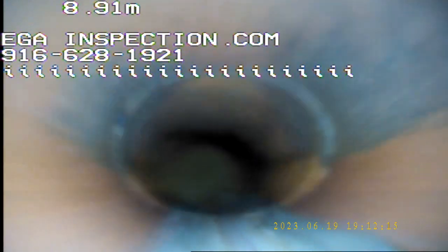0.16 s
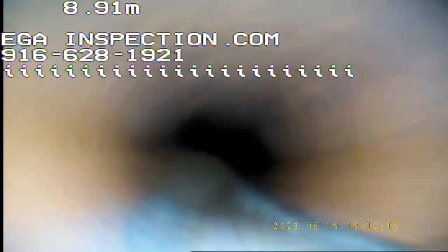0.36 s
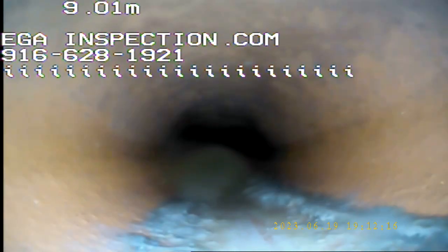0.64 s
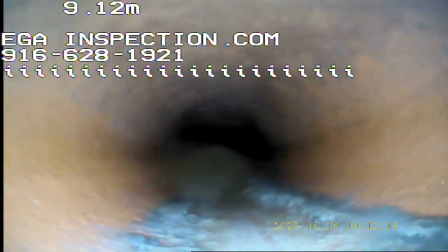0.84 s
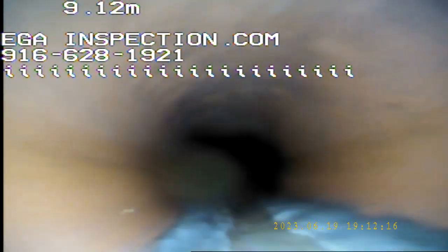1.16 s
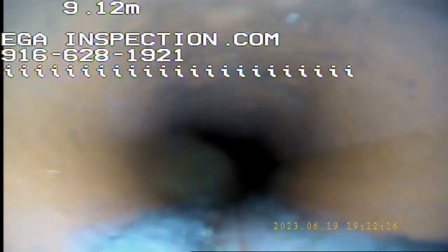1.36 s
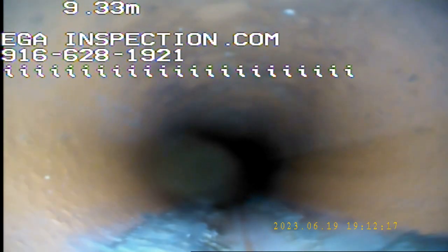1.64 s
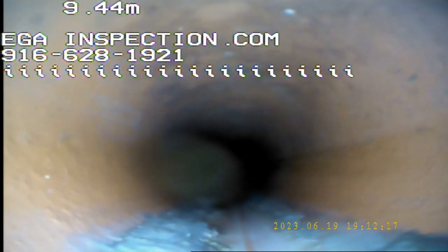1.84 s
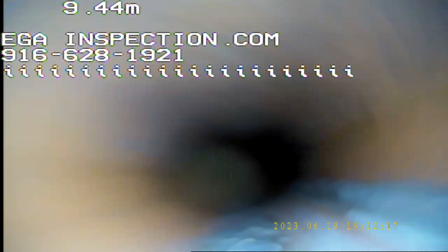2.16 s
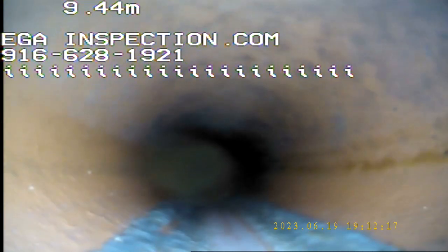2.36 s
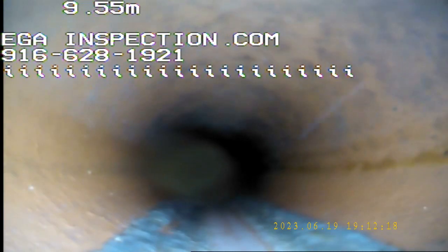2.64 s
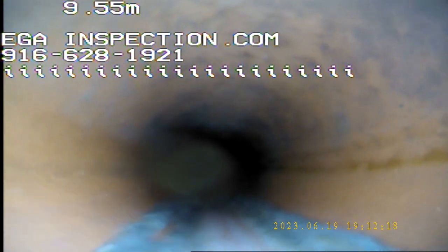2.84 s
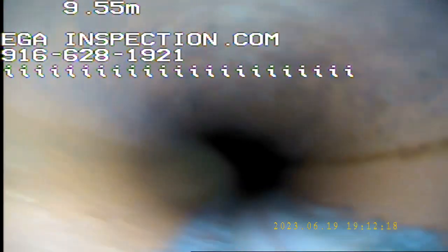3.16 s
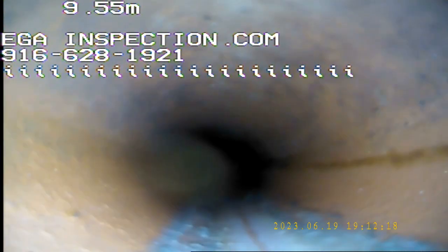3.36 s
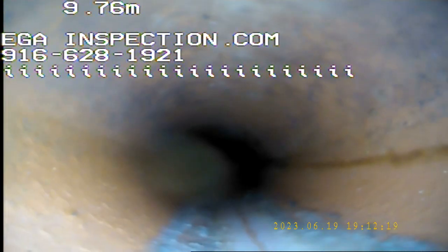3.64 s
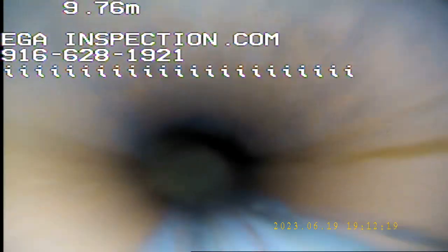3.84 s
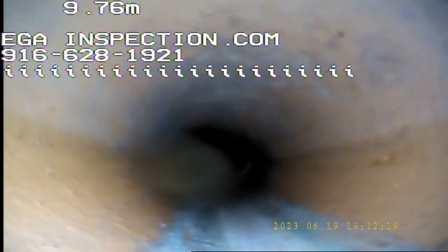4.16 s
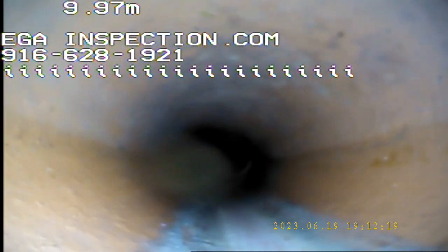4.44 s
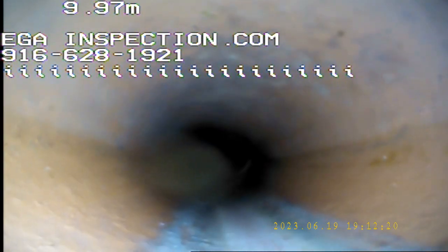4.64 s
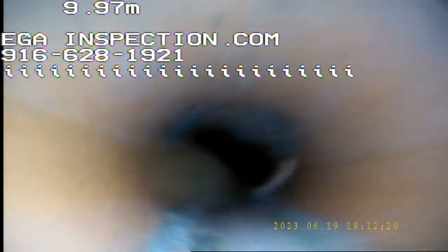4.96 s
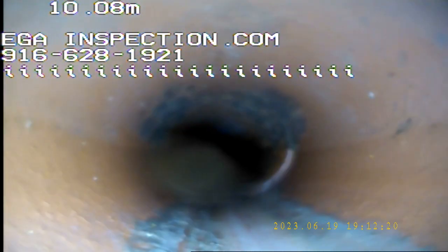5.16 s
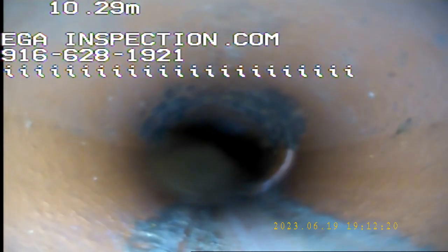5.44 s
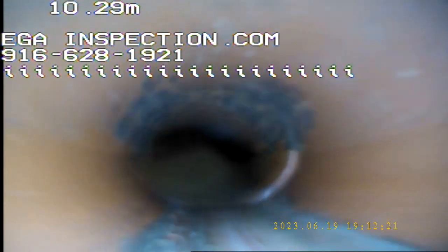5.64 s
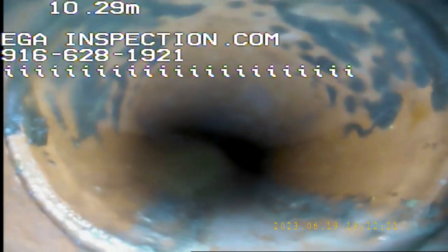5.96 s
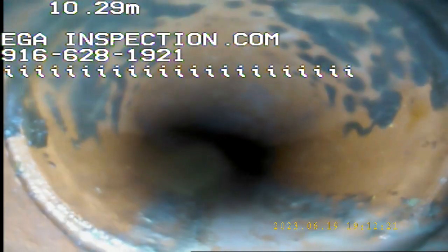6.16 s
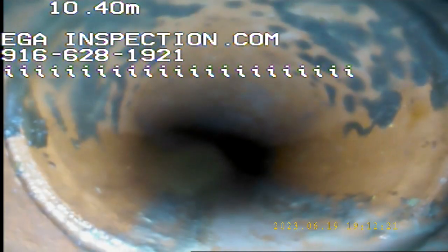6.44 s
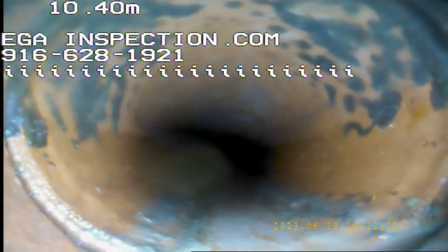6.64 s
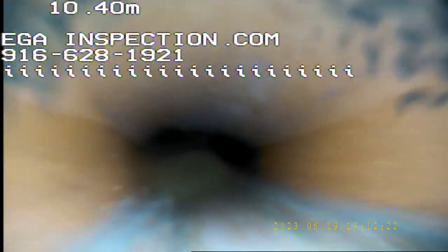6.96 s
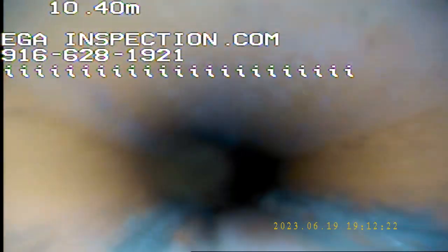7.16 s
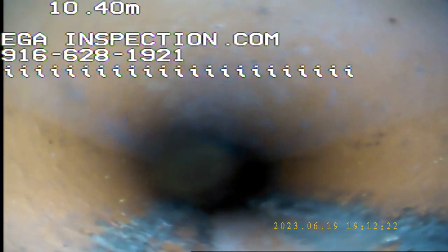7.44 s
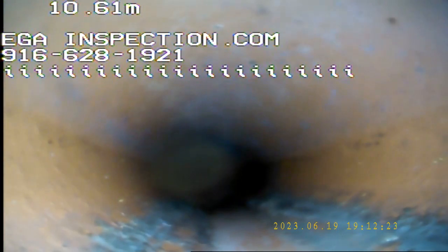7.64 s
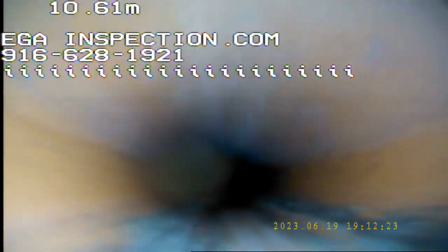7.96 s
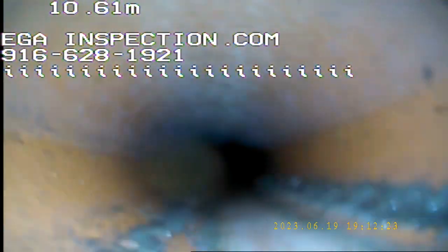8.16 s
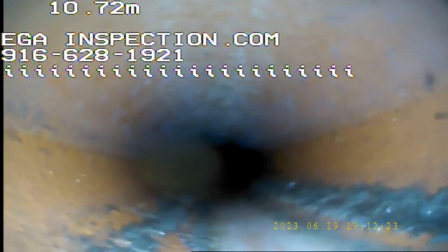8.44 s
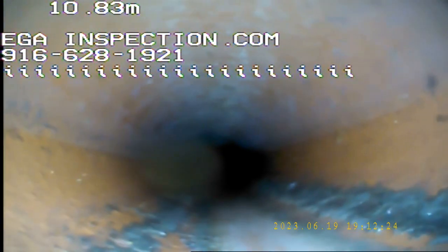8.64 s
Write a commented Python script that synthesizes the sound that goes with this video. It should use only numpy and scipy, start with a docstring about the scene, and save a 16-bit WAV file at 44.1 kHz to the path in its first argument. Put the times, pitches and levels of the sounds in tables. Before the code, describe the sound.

Loud, distorted low booms and hollow rattling scrapes come in uneven strokes as a rod is shoved through a pipe, crackling with overload over faint hiss.

```python
"""Camera rod in a drain pipe

A push rod feeds a camera head down a drain pipe in strokes; the microphone rides on the gear.
Stick-slip friction excites the modes of pipe, housing and rod; knocks ring rod and housing; hiss lies beneath.
An overloaded narrow-band converter flattens the wave at both rails, and at listed jolts samples
at the top flip to the bottom and crackle."""
import sys
import numpy as np
from scipy import signal
from scipy.fft import rfft, irfft
from scipy.io import wavfile
from scipy.ndimage import uniform_filter1d

SR = 44100
rng = np.random.default_rng(int(sys.argv[2]) if len(sys.argv) > 2 else 0)


def transcribe(u):
    """Save the signal u as a 16-bit wav file named by the first command-line argument.

    u: samples, shape (n,) or (channels, n), limited to [-1, 1]; the rate is SR.
    q: integer samples, one column per channel.
    """
    v = np.clip(np.atleast_2d(u).T, -1, 1)
    q = np.round(v * 32767).astype(np.int16)
    wavfile.write(sys.argv[1], SR, q)


N = 388509  # samples in the scene
CONVERTER_SR = 8000  # sample rate of the narrow-band converter, Hz

# Shoves of the rod; share is the part of the length at which the shove is hardest:
# start_s, length_s, peak_share, boom_db, thump_db, body_db
SHOVES = [(0.0, 0.0844, 0.326, -7.5, -13.5, -14.5), (.12, 0.292, 0.31, -18.5, -26.5, -23),
          (.46, 0.374, 0.662, -6, -9.5, -11.5), (.86, 0.1205, 0.28, -9.5, -20.5, -21),
          (1.02, 0.228, 0.62, -16, -28, -22.5), (1.225, 0.109, 0.286, -7, -9, -6),
          (1.385, 0.1084, 0.253, -6.5, -8.5, -7), (1.54, 0.2835, 0.598, -8, -10, -6),
          (1.86, 0.254, 0.285, -11.5, -24.5, -24.5), (2.1, 0.0906, 0.487, -8, -16.5, -16),
          (2.2, 0.129, 0.474, -18, -25.5, -20), (2.385, 0.451, 0.708, -8.5, -13, -12),
          (2.85, 0.214, 0.624, -14.5, -21.5, -26), (3.07, 0.1195, .5, -18.5, -17.5, -16),
          (3.225, 0.5316, 0.605, -6.5, -12, -12.5), (3.8, 0.26, 0.657, -16, -16.5, -22),
          (4.12, 0.4835, 0.495, -7.5, -10.5, -10.5), (4.65, 0.351, 0.684, -17.5, -21.5, -23.5),
          (4.99, .1, .5, -17, -19, -19), (5.09, .48, .6, -5, -7, -11), (5.63, .08, 0.496, -5.5, -26, -21.5),
          (5.8, 0.1587, .6, -23.5, -24, -25), (6.17, .07, .9, -13, -28, -24),
          (6.22, .44, 0.494, -5, -13, -11), (6.7, 0.0596, .4, -12, -23.5, -22),
          (6.79, 0.172, 0.575, -15.5, -23.5, -23.5), (6.97, 0.19, 0.445, -9, -24.5, -21.5),
          (7.195, 0.5746, 0.587, -7, -9, -10), (7.82, 0.2316, 0.525, -10.5, -13, -22.5),
          (8.085, 0.097, 0.285, -10, -22.5, -19.5), (8.21, 0.157, 0.375, -2.5, -3.5, -8.5),
          (8.41, .14, .6, -11, -9, -3), (8.54, .32, .2, -4, -18, -15)]
# Spells of the rod sliding over the rim: start_s, length_s, peak_share, scrape_db
RUBS = [(0.0, 0.431, 0.572, -21.5), (.46, 0.388, 0.226, -19.5), (.9, 0.367, 0.464, -24.5),
        (1.215, 0.0896, 0.36, -20), (1.33, 0.5764, 0.57, -19.5), (1.95, 0.441, 0.68, -34.5),
        (2.385, 0.395, 0.345, -18), (2.8, 0.426, .7, -22.5), (3.23, 0.339, 0.33, -19),
        (3.6, 0.1924, 0.62, -32.5), (3.8, 0.34, 0.57, -34), (4.0, 0.44, 0.314, -26),
        (4.21, 0.318, 0.46, -17), (4.5, 0.2006, 0.35, -25), (4.72, 0.334, 0.566, -35),
        (5.0, 0.546, 0.416, -19.5), (5.6, 0.326, .4, -39.5), (6.17, .09, .9, -25), (6.25, .35, .4, -19),
        (6.7, 0.185, .4, -27), (6.9, 0.57, 0.58, -35), (7.2, 0.442, 0.595, -17.5), (7.65, .42, .2, -36),
        (8.08, .12, 0.31, -33), (8.22, 0.1595, 0.44, -16), (8.42, 0.2014, 0.38, -16.5),
        (8.67, 0.187, 0.29, -34.5)]
# How each layer follows a spell; start and end levels are counted down from the top:
# attack_s, start_drop_db, end_drop_db, release_db_per_s, rest_level_db
BOOM_SHAPE = (0.0221, 3, 3, 170, -32)
THUMP_SHAPE = (0.002, 10, 8.5, 120.5, -43.5)
BODY_SHAPE = (0.0609, 9, 9.5, 110, -46)
RUB_SHAPE = (0.0277, 4, 4.5, 250.5, -54.5)
# Lowest modes of the pipe: pitch_hz, width_hz, relative_level_db
BOOM_MODES = [(79.445, 21.72, -1.5), (54.8, 22, -24.5), (116.2, 19.77, -11)]
# Next modes of the pipe: pitch_hz, width_hz, relative_level_db
THUMP_MODES = [(155.51, 28.3, -1.5), (185.51, 19.6, -3.5), (221.82, 36, -11.5)]
# Modes of the hollow housing: pitch_hz, width_hz, relative_level_db
BODY_MODES = [(269.6, 34, -5.5), (313.5, 30, 0.5), (357.5, 65, -6.5), (456.7, 95.8, 1), (542.3, 70.8, -5.5),
              (642, 310, -23.5)]
# Modes of rod and reel: pitch_hz, width_hz, relative_level_db
ROD_MODES = [(773, 93.8, -5), (1029.7, 103.9, -4), (1115.1, 62.3, -0.5), (1296.3, 340, -14),
             (1485, 56.4, -3), (1661.7, 190, -14), (1992, 110.8, -7.5), (2178, 76, -8), (2489, 550, -25),
             (3109, 180, -28), (3874, 1100, -33)]
# Knocks; the thud is set against the ring, the tilt applies to the ring:
# start_s, ring_db, thud_relative_db, rattle_decay_s, tilt_db_per_octave
KNOCKS = [(0.921, -12, -15.5, 0.0282, 1.16), (2.272, -12.5, -5, 0.0291, -0.5),
          (2.379, -9.5, -8, 0.0515, 0.5), (3.019, -7, -5, 0.0408, -5.5), (3.114, -4, -10, 0.021, 2),
          (3.676, -6, 3, 0.0201, -4), (4.012, -6.5, -7.5, 0.0309, -0.22), (4.676, -12, -5.5, 0.0078, -3),
          (4.872, -26.5, 15, 0.025, 5.5), (4.991, -10, 5.5, 0.0154, 1), (5.619, -34, 22, 0.0102, 1.5),
          (5.756, -31.5, 14.5, 0.026, 3.5), (5.808, -28.5, 14.5, 0.026, 2),
          (6.063, -53.5, 31.5, 0.0141, -2.5), (6.583, -14.5, -9, 0.0174, -1.5),
          (6.731, -13.5, -6, 0.0686, -2.22), (6.849, -18, 5.5, 0.011, -1), (6.997, -14, -20, 0.025, -4),
          (7.054, -17.5, 9, 0.0205, -4.5), (7.739, -29, 6, 0.0113, 5), (7.917, -26.5, 19.5, 0.013, 2.5),
          (8.022, -23, 6, 0.0158, -0.5), (8.088, -9.5, 4, 0.0065, -2), (8.137, -17.5, -9, 0.0187, 0.5)]
# Spectrum of the steady hiss against unit white noise: frequency_hz, level_db
HISS = [(20, -44.5), (300, -32.5), (900, -54), (2300, -53), (4000, -59.5)]
# Bouts of jolts that overload the converter:
# first_s, last_s, jolt_count, first_flip_samples, mean_other_flip_samples
BOUTS = [(.0141, .0141, 1, 1, 1), (.5015, .5495, 4, 2, 1.7), (.5618, .6011, 4, 6, 1),
         (.6288, .6363, 2, 1, 2), (.6709, .6822, 2, 2, 2), (.6998, .7069, 2, 5, 2), (.7661, .7661, 1, 2, 1),
         (1.235, 1.2537, 3, 15, 4), (1.276, 1.2875, 2, 1, 1), (1.3343, 1.3343, 1, 1, 1),
         (1.4045, 1.4218, 4, 1, 1.3), (1.4388, 1.4414, 2, 1, 1), (1.4574, 1.4794, 3, 1, 1.5),
         (1.5876, 1.5876, 1, 1, 1), (1.611, 1.6365, 3, 5, 2), (1.6455, 1.6574, 3, 1, 1),
         (1.6703, 1.683, 2, 3, 1), (1.6924, 1.7192, 4, 5, 1.7), (1.7323, 1.7475, 2, 1, 1),
         (1.7869, 1.8044, 2, 1, 1), (2.4172, 2.4284, 2, 1, 2), (2.4768, 2.4894, 2, 1, 1),
         (2.5, 2.5395, 5, 6, 2), (2.5827, 2.5934, 2, 1, 1), (2.6608, 2.6897, 3, 5, 5),
         (2.7074, 2.7574, 6, 1, 1.9), (2.8538, 2.8538, 1, 1, 1), (3.1266, 3.1434, 2, 1, 1),
         (3.2443, 3.286, 3, 1, 1), (3.4379, 3.4495, 2, 1, 1), (3.4656, 3.4709, 2, 2, 2),
         (3.4929, 3.4929, 1, 1, 1), (3.566, 3.566, 1, 1, 1), (3.6837, 3.6924, 3, 3, 1.5),
         (4.25, 4.25, 1, 1, 1), (4.2755, 4.3014, 3, 3, 4.5), (4.3281, 4.3396, 2, 3, 5),
         (4.3728, 4.3728, 1, 3, 1), (4.3948, 4.402, 2, 2, 1), (4.449, 4.449, 1, 1, 1),
         (4.5292, 4.5292, 1, 1, 1), (5.1413, 5.192, 5, 2, 1), (5.2259, 5.2707, 2, 1, 1),
         (5.3788, 5.4222, 3, 1, 1), (6.2843, 6.2971, 3, 2, 1), (6.3509, 6.3509, 1, 1, 1),
         (6.3749, 6.4278, 4, 1, 1.7), (6.4496, 6.4496, 1, 3, 1), (6.4832, 6.4832, 1, 2, 1),
         (7.2646, 7.2646, 1, 1, 1), (7.3304, 7.3418, 2, 2, 1), (7.3929, 7.43, 5, 2, 1.3),
         (7.4514, 7.4514, 1, 1, 1), (7.507, 7.511, 2, 1, 1), (7.5502, 7.5814, 3, 1, 2),
         (8.2383, 8.2383, 1, 1, 1), (8.2602, 8.2685, 2, 5, 1), (8.3033, 8.3124, 2, 2, 2),
         (8.3234, 8.3663, 3, 4, 1), (8.4775, 8.5163, 5, 5, 2), (8.5247, 8.5463, 3, 6, 3),
         (8.5749, 8.5749, 1, 1, 1), (8.6054, 8.6351, 3, 3, 1)]
# Crests so far past the top rail that they wrap whole to the bottom: start_s, length_ms
CRESTS = [(4.3144, 1.9), (4.326, 0.5), (8.2714, 2.4), (8.2871, 2.7), (8.2994, 2.7)]
# Single samples wrapped by the faster stage: time_s
SNAPS = [1.61199, 2.6735]


def pipe():
    """Forced and free vibration: friction drives the pipe's lowest modes and each jolt kicks it upward."""
    friction = slips(per_s=900, spread_db=-1.0, flutter_db=-1.5, flutter_s=0.011)
    shaken = evened(ring(friction, BOOM_MODES))
    jolts_s = np.concatenate([np.linspace(*bout[:3]) for bout in BOUTS])
    kicks = np.zeros(N)
    kicks[np.round((jolts_s - .0008) * SR).astype(int)] = 1  # the kick leads its jolt by 0.8 ms
    t = np.arange(SR // 20) / SR
    swing = np.sin(2 * np.pi * 82 * t) * gain_of(-60 * t / 0.0991)  # 82 Hz, falling 60 dB in 99.1 ms
    kicked = signal.oaconvolve(kicks, swing)[:N]
    return effort(SHOVES, axis=3, shape=BOOM_SHAPE) * (shaken + gain_of(7.5) * kicked)


def body():
    """Resonance under stick-slip: coarser slips sound the pipe's next modes and the hollow of the housing."""
    thump = ring(slips(per_s=700, spread_db=3, flutter_db=1, flutter_s=0.051), THUMP_MODES)
    hollow = ring(slips(per_s=1200, spread_db=0.5, flutter_db=2, flutter_s=0.029), BODY_MODES)
    thump_level = effort(SHOVES, axis=4, shape=THUMP_SHAPE)
    hollow_level = effort(SHOVES, axis=5, shape=BODY_SHAPE)
    return thump_level * evened(thump) + hollow_level * evened(hollow)


def scrape():
    """Modal coupling: fine slips on the rim ring the rod; a wandering contact swells each mode on its own."""
    rub = slips(per_s=2500, spread_db=2.0, flutter_db=1.5, flutter_s=0.017)
    knots = np.arange(0, N + 3000, 3000)  # samples, about 70 ms apart
    wander_db = 2.4 * rng.standard_normal((len(ROD_MODES), len(knots)))
    total = np.zeros(N)
    for k, mode in enumerate(ROD_MODES):
        swell = gain_of(np.interp(np.arange(N), knots, wander_db[k]))
        total += (-1) ** k * ring(rub, [mode]) * swell
    return effort(RUBS, axis=3, shape=RUB_SHAPE) * evened(total)


def knocks():
    """Impact excitation: a short rattle, quick to rise and slower to die, rings the rod and body modes."""
    out = np.zeros(N + SR)
    t = np.arange(SR // 5) / SR
    for start_s, ring_db, thud_db, decay_s, tilt_db in KNOCKS:
        envelope = np.exp(-t / decay_s) * (1 - np.exp(-t / (0.21 * decay_s)))
        rattle = rng.standard_normal(len(t)) * envelope
        tilted = [(hz, width, db + tilt_db * np.log2(hz / 1100)) for hz, width, db in ROD_MODES]
        bright = ring(rattle, tilted)
        dull = ring(rattle, BODY_MODES)
        knock = bright / abs(bright).max() + gain_of(thud_db) * dull / abs(dull).max()
        out[round(start_s * SR):][:len(t)] += gain_of(ring_db) * knock
    return out[:N]


def hiss():
    """Stationary noise: a steady hiss beneath everything, white noise shaped in frequency."""
    hz, db = np.transpose(HISS)
    shape_db = np.interp(np.log(np.fft.rfftfreq(N, 1 / SR) + 1), np.log(hz), db)
    return irfft(rfft(rng.standard_normal(N)) * gain_of(shape_db), N)


def slips(per_s, spread_db, flutter_db, flutter_s):
    """Stick-slip friction: random ticks of uneven size whose level flutters in clumps."""
    tick = rng.random(N) < per_s / SR
    size = np.minimum(rng.exponential(1, N), 4)
    sign = rng.standard_normal(N)
    span = max(round(flutter_s * SR), 1)
    clump = uniform_filter1d(uniform_filter1d(rng.standard_normal(N), span), span)
    return tick * sign * gain_of(spread_db * size + flutter_db * evened(clump))


def ring(x, modes):
    """Modal resonance: two equal resonators in series per mode, neighbouring modes in opposite phase."""
    out = np.zeros(len(x))
    for k, (hz, width, db) in enumerate(modes):
        radius, angle = np.exp(-np.pi * width / SR), 2 * np.pi * hz / SR
        peak_gain = 2 * (1 - radius) * np.sin(angle)  # brings each resonance to about gain 1
        stage = [peak_gain, 0, 0, 1, -2 * radius * np.cos(angle), radius * radius]
        out += (-1) ** k * gain_of(db) * signal.sosfilt([stage, stage], x)
    return out


def effort(spells, axis, shape):
    """Addition of powers: each spell rises, swells to its top, sags and dies away over a resting level."""
    attack_s, start_db, end_db, release_db, rest_db = shape
    t = np.arange(0, N + 64, 64) / SR
    power = gain_of(2 * rest_db)
    for row in spells:
        start_s, length_s, share = row[:3]
        times = [0, share * length_s, length_s, length_s + 1]
        swell_db = np.interp(t - start_s, times, [-start_db, 0, -end_db, -end_db - release_db])
        # a spell that starts at zero is already under way
        rise = np.clip((t - start_s) / attack_s + (start_s == 0), 0, 1)
        power = power + (rise * gain_of(row[axis] + swell_db)) ** 2
    return np.interp(np.arange(N) / SR, t, np.sqrt(power))


def gain_of(db):
    """Decibel law: amplitude ratio of a level."""
    return 10 ** (np.asarray(db) / 20)


def evened(x):
    """Normalisation: scales a signal to unit RMS."""
    return x / np.sqrt(np.mean(x ** 2) + 1e-20)


def scene():
    """Superposition: the sources add linearly into one channel."""
    return (pipe() + body() + scrape() + knocks() + hiss())[None]


def overflow(low, rail):
    """Clipping and wraparound: at a jolt the wave leaps to the top rail and some samples wrap to the bottom."""
    flips = np.zeros(len(low), bool)
    for first_s, last_s, jolts, lead, mean in BOUTS:
        for k, jolt_s in enumerate(np.linspace(first_s, last_s, jolts)):
            stray = rng.random() * 2 - 1
            more = -np.log(rng.random())
            count = lead if k == 0 else min(1 + round((mean - 1) * (more + 1) / 2), 8)
            # wraps come at least two samples apart, with a few gaps up to 9 samples longer
            gaps = 2 + 9 * rng.random(count - 1) ** 3 * min(1, 4 / count)
            if 0 < k < jolts - 1:
                jolt_s += .003 * stray  # jolts inside a bout stray by up to 3 ms
            steps = np.round(np.cumsum([0, *gaps])).astype(int)
            flips[round(jolt_s * CONVERTER_SR) + steps] = True
    for start_s, length_ms in CRESTS:
        end_s = start_s + length_ms / 1000
        flips[round(start_s * CONVERTER_SR):round(end_s * CONVERTER_SR) + 1] = True
    top = np.where(uniform_filter1d(flips * 1., size=3) > 0, rail, -rail)
    leap = top
    for step in range(1, 5):  # the climb to the rail and the fall from it take a few samples
        climb = np.roll(top, -step) - .35 * step
        fall = np.roll(top, step) - .4 * step
        leap = np.maximum(leap, np.maximum(climb, fall))
    return np.where(flips, -rail, np.clip(np.maximum(low, leap), -rail, rail))


def record(dry):
    """Band limiting and overload: bass-shy microphone, narrow-band converter, faster stage that clips overshoot."""
    heard = signal.sosfilt(signal.butter(3, 52, "high", fs=SR, output="sos"), dry[0])
    low = overflow(signal.resample_poly(heard, 80, 441) - .01, rail=.692)  # slight downward offset
    smooth = signal.firwin(441 * 28 + 1, 3960, window=("kaiser", 8), fs=SR * 80)
    wide = np.clip(signal.resample_poly(low, 441, 80, window=smooth)[:N], -.715, .713)
    for snap_s in SNAPS:  # a short plateau whose middle sample wraps
        wide[round(snap_s * SR) + np.arange(-2, 3)] = .48 * np.array([1, 1, -1, 1, 1])
    treble_limit = signal.firwin(255, 16300, window=("kaiser", 9), fs=SR)  # low-pass at 16.3 kHz
    return signal.oaconvolve(wide, treble_limit, "same")[None]


dry = scene()
out = record(dry)
transcribe(out)
```